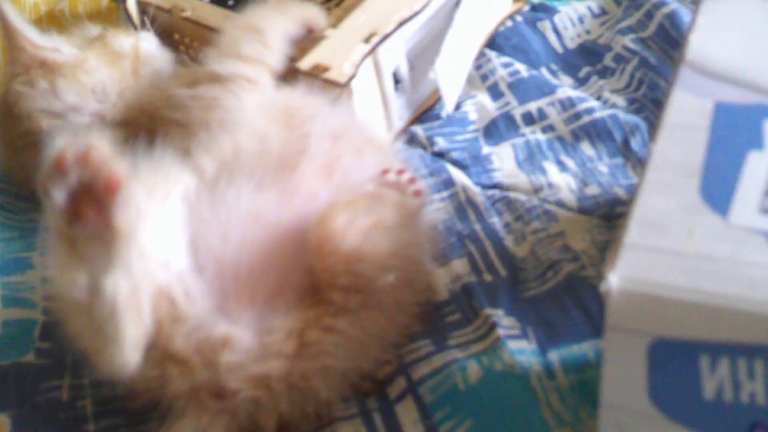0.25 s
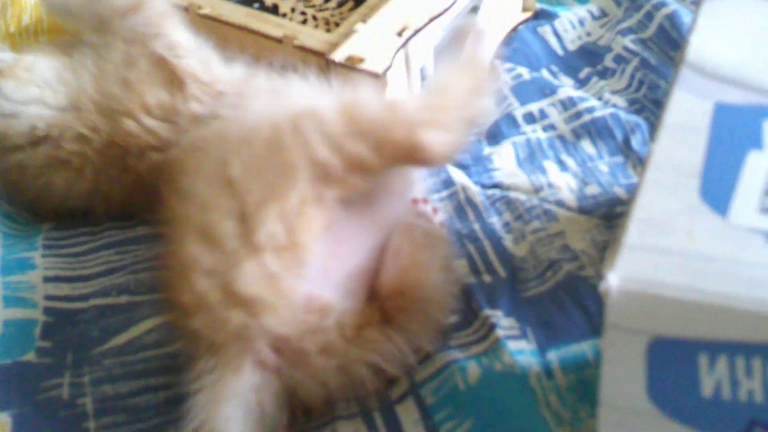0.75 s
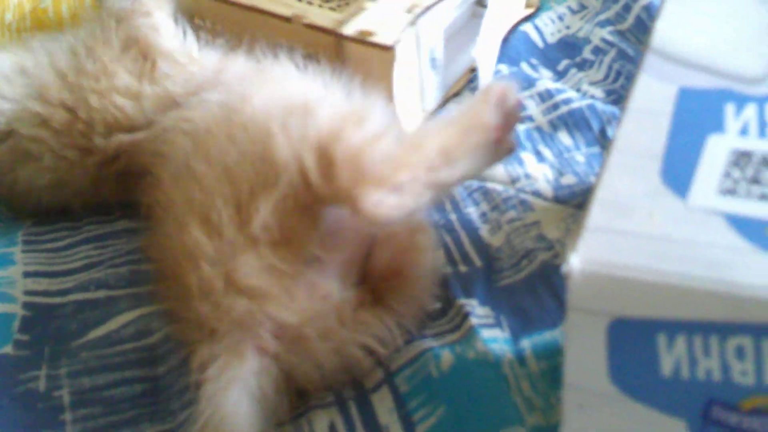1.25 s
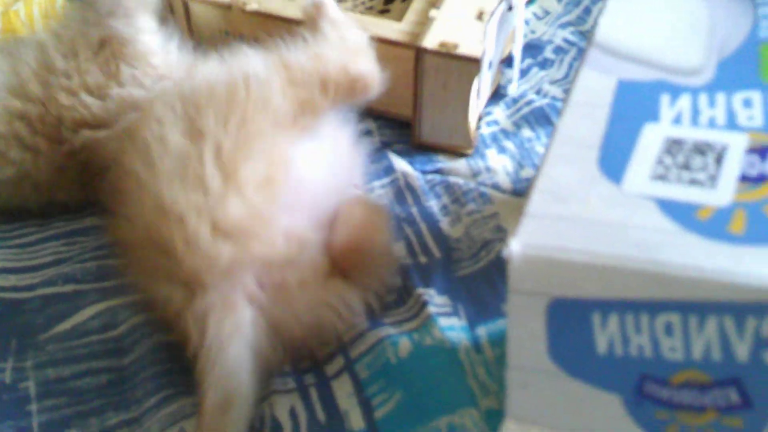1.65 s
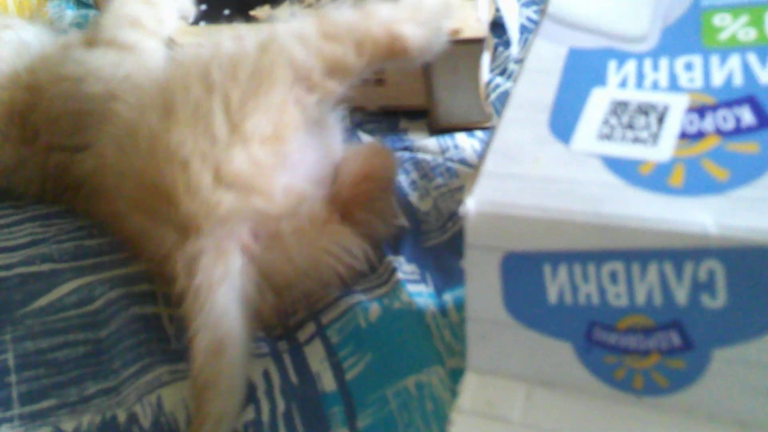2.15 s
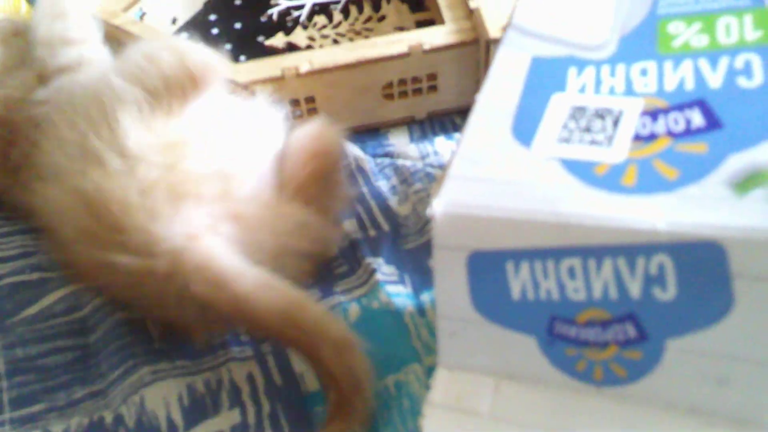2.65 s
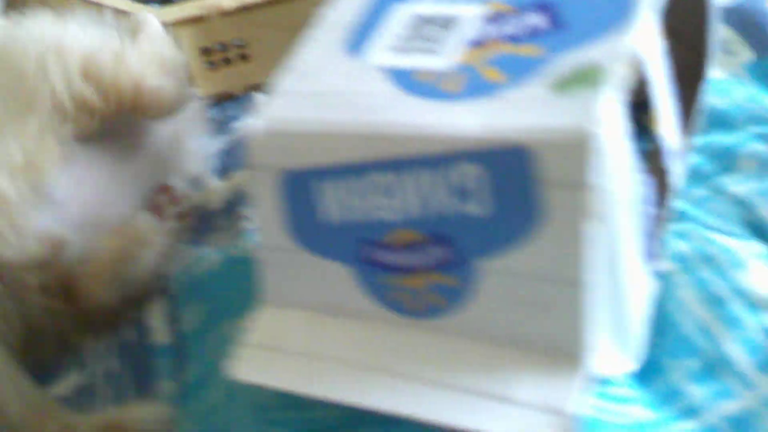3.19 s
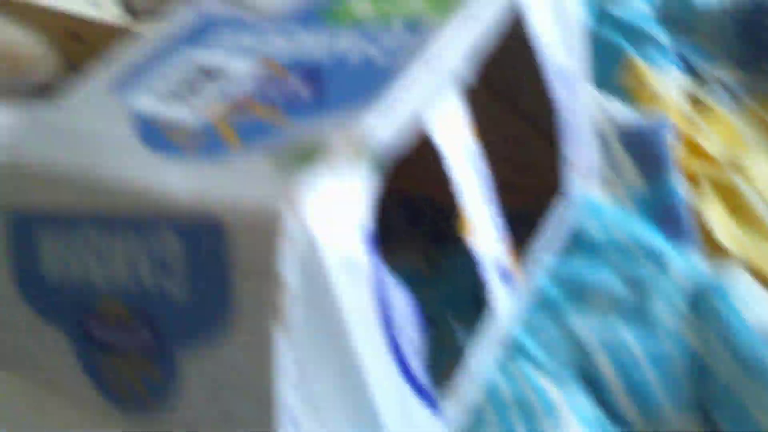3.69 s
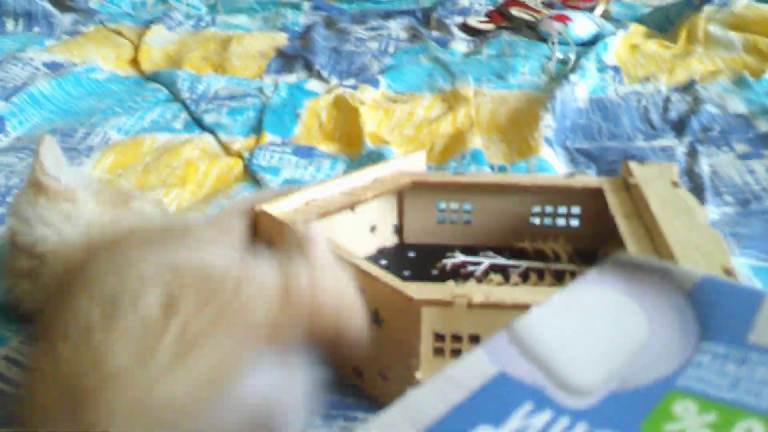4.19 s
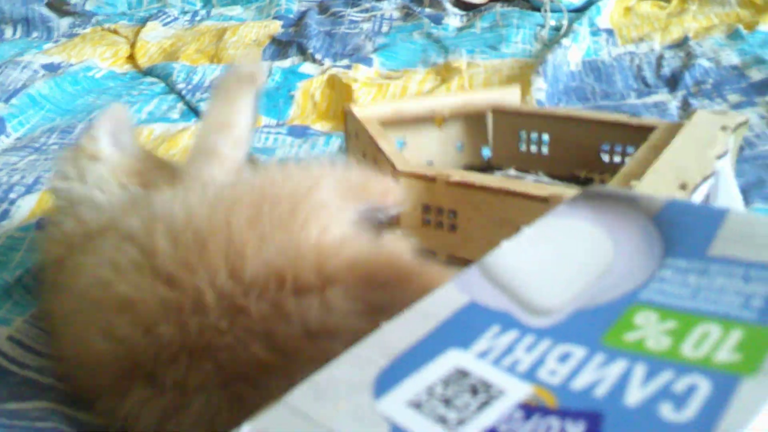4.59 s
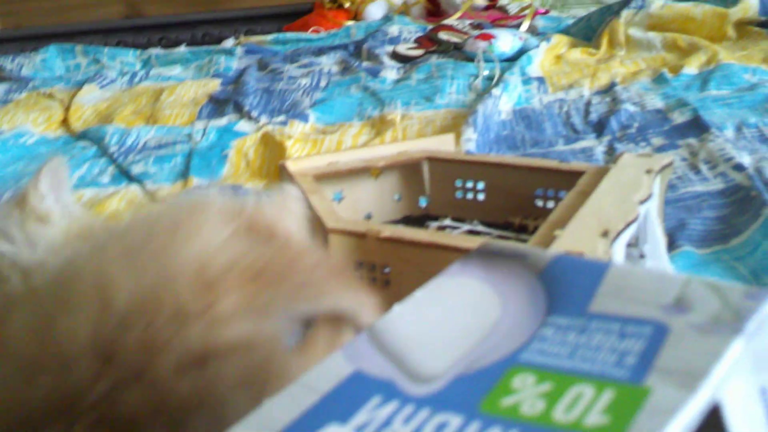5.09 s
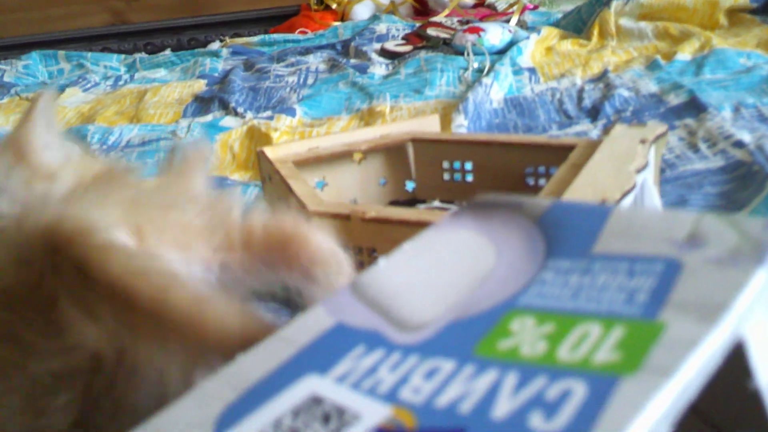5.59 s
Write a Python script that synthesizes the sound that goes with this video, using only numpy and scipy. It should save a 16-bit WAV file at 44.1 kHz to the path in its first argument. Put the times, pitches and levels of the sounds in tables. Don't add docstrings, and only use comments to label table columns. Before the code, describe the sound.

Small claws tap, scratch and drag on a thin wooden box over low hum, then a soft thud and two hollow carton knocks.

```python
import sys
import numpy as np
from scipy import signal
from scipy.io import wavfile

SR = 44100
rng = np.random.default_rng(int(sys.argv[2]) if len(sys.argv) > 2 else 0)


def natural_amplitude(level_db):
    exponent = np.asarray(level_db, float) / 20
    return 10 ** exponent


def wrap_up_sound(samples):
    columns = np.atleast_2d(samples).T
    tamed = np.clip(columns, -1, 1)
    steps = np.round(tamed * 32767).astype(np.int16)
    wavfile.write(sys.argv[1], SR, steps)


N = 257544


def rms_one(x):
    return x / np.sqrt(np.mean(x ** 2) + 1e-20)


def curve(rows):
    s, level_db = np.transpose(rows)
    return np.interp(np.arange(N) / SR, s, level_db)


def drift(rate_hz):
    r = np.exp(-80 * np.pi * rate_hz / SR)
    white = rng.standard_normal(N // 40 + 2002)
    slow = signal.lfilter([1], [1, -2 * r, r * r], white)[2000:]
    return np.interp(np.arange(N) / 40, np.arange(len(slow)), rms_one(slow))


def ring(force, hz, width_hz):
    r, w = np.exp(-np.pi * width_hz / SR), 2 * np.pi * hz / SR
    return signal.lfilter([0, np.sin(w)], [1, -2 * r * np.cos(w), r * r], force + 1e-18)


def ring_width(t60_s):
    return np.log(1000) / np.pi / t60_s


def grains(size, per_s, spread_db):
    strength = natural_amplitude(spread_db * np.minimum(rng.exponential(1, size), 4))
    strength = strength * rng.choice([-1, 1], size)
    return rms_one(strength * (rng.random(size) < per_s / SR))


def blows(table, modes, push, swing, turn):
    out, size = np.zeros(N + SR), SR // 2
    ms = np.arange(size) / SR * 1000

    def bump(start_ms, contact_ms):
        return np.sin(np.pi * np.clip((ms - start_ms) / contact_ms, 0, 1)) ** 4

    for s, peak_db, contact_ms, second_ms, strength in table:
        first = bump(0, contact_ms)
        contact = first + strength * bump(second_ms, contact_ms)
        body = 0
        for k, (hz, db, t60) in enumerate(modes):
            body = body + turn ** (k + 1) * natural_amplitude(db) * ring(contact / first.sum(), hz, ring_width(t60))
        blow = swing * body + push * contact
        out[round(s * SR):][:size] += natural_amplitude(peak_db) * blow / np.abs(blow).max()
    return out[:N]


# f/Hz, level/dB per Hz
AIR_COLOUR = [(22, -7), (40, 1), (75, -11), (120, -8.5), (160, -13.5), (265, -18), (400, -20), (750, -34),
              (1000, -33), (2400, -40), (3300, -54), (5000, -76), (7500, -54.5), (9000, -48.5)]


def room_air():
    edges = 20 * 2 ** np.arange(0, 9.1, .5)
    white, out = rng.standard_normal((2, N)), 0
    hz, level_db = np.transpose(AIR_COLOUR)
    for k, (low, high) in enumerate(zip(edges, edges[1:])):
        band_pass = signal.butter(2, [low, high], "band", fs=SR, output="sos")
        band = signal.sosfilt(band_pass, white[k % 2])
        band_db = np.interp(np.log(low * high) / 2, np.log(hz), level_db)
        out = out + band * natural_amplitude(band_db + 1.2 * drift(5))
    return natural_amplitude(-54.5) * rms_one(out)


# multiple of the mains pitch, level/dB
HUM_LINES = [(1, -52), (2, -72), (3, -65), (4, -68), (5, -71)]


def mains_hum():
    t, mains_hz, out = np.arange(N) / SR, 49.06, 0
    for k, db in HUM_LINES:
        tone = np.sin(2 * np.pi * (k * mains_hz * t + rng.random()))
        out = out + natural_amplitude(db + .6 * drift(2)) * tone
    return natural_amplitude(1.5) * out


# t/s, level/dB
MOTOR_LEVEL = [(0, -68.5), (3.06, -73.5), (4.0, -60.5), (4.7, -60), (4.83, -54.5), (5.2, -59),
               (5.38, -49.5), (5.48, -57.5), (5.58, -56.5), (5.84, -55.5)]


def motor_drone():
    pitch_hz = 163.1 + 3.98 * drift(3)
    tone = natural_amplitude(3.4 * drift(8.3)) * np.sin(2 * np.pi * np.cumsum(pitch_hz) / SR)
    return natural_amplitude(curve(MOTOR_LEVEL)) * tone


# t/s, level/dB
AIR_PUSH = [(0, -62), (1.3, -53.5), (2.1, -66.5), (2.4, -56), (3.4, -57), (3.9, -56), (4.3, -49.5),
            (4.68, -43), (5.09, -58), (5.37, -47), (5.84, -65.5)]


def moving_air():
    sway = ring(ring(rng.standard_normal(N), 13, 3), 15, 3.6)
    return natural_amplitude(curve(AIR_PUSH)) * rms_one(sway)


# f/Hz, width/Hz, level/dB
BOX_PANELS = [(408, 198, 3.5), (511.2, 23.3, -3), (609, 47.3, -1), (773.6, 59, 1), (861.7, 29, -4),
              (1020, 193, -2.5), (1500, 71, -4), (1900, 156, -1.5), (2082, 51, -7.5), (2320, 90, -4.5),
              (2818, 158, -4.5), (3150, 150, -9), (3473, 127, -14.5), (4050, 140, -21.5), (5400, 550, -47),
              (6100, 170, -29.5), (6970, 1200, -13.5), (8550, 310, -13.5)]
# t/s, level/dB
RUB_WEIGHT = [(0, -59.5), (.3, -61.5), (.5, -64.5), (.85, -66), (1.28, -61.5), (1.54, -56.5), (1.69, -65.5),
              (2.05, -62.5), (2.3, -58), (2.43, -59), (2.6, -61.5), (2.98, -67.5), (3.53, -64), (4.0, -60),
              (4.29, -61), (4.37, -56), (4.99, -66.5), (5.84, -65.5)]
# level/dB at mean weight, share of the weight's swing, level/dB under a full touch
RUB_PARTS = [(-73.5, 1, -28.5), (-101, .2, -48), (-84, .4, -52.5)]


def fur():
    slips = grains(N, per_s=5000, spread_db=3) + .3 * grains(N, per_s=400, spread_db=3)
    together = drift(6)
    parts = np.zeros((4, N))
    for k, (hz, width, level_db) in enumerate(BOX_PANELS):
        patch = natural_amplitude(level_db + 1.5 * together + 1.3 * drift(20))
        part = int(hz > 1200) + int(hz > 3700) + int(hz > 4800)
        parts[part] += (-1) ** k * ring(slips * patch, hz, 1.68 * width)
    parts[2] = rms_one(ring(parts[2], 4370, 70)) + 1.1 * rms_one(ring(slips, 3950, 700))

    weight_db, slide, mean_db = curve(RUB_WEIGHT), lingering(), -63
    gains = [natural_amplitude(weight_db)]
    for db, share, touch_db in RUB_PARTS:
        gains.append(natural_amplitude(db + share * (weight_db - mean_db)) + natural_amplitude(touch_db) * slide)
    gains = np.array(gains)
    gains[2:] += brushing()
    return sum(gain * rms_one(part) for gain, part in zip(gains, parts))


# t/s, peak level/dB, loudest ring f/Hz, low panels level/dB
PAT_TOUCHES = [(0.182, -36.5, 1730, -6), (0.7, -51.5, 2320, -11), (0.8, -51.5, 1600, -6),
               (1.2281, -42.5, 2330, -17), (1.4486, -37, 2830, -13), (1.6222, -43.5, 2020, -20),
               (1.7439, -32, 2270, -7.5), (1.9355, -45.5, 1900, 2.5), (2.0393, -37.5, 1340, -9),
               (2.2682, -53, 2270, 3), (2.4104, -42, 1500, -6.5), (2.4633, -58, 1500, 4),
               (2.5137, -55, 2470, 2.5), (2.6743, -54.5, 1460, 12), (2.7457, -52.5, 1700, 1),
               (2.9078, -33.5, 1670, -15.5), (3.6456, -28.5, 2320, -19), (4.1584, -55.5, 1530, 11),
               (4.1999, -49, 1450, 9), (4.2223, -55, 1020, 10), (4.2494, -53, 1200, 7.5),
               (5.3023, -31, 2065, -13)]
SCRATCH_TOUCHES = [(0.035, -47.5, 2120, -12), (0.3755, -46.5, 1430, -6), (0.398, -45.5, 1850, -17),
                   (0.9058, -33.5, 2500, -18), (1.045, -42, 1430, -9.5), (1.2032, -42.5, 1900, -14),
                   (1.5594, -58, 1630, 10.5), (1.6394, -50.5, 1900, -4), (1.7694, -33, 1360, -10),
                   (1.8726, -51, 1500, -2), (1.9494, -39, 2770, -28), (2.1464, -49, 2280, 8),
                   (2.1565, -40.5, 1380, -5.5), (2.6125, -46, 1500, 2), (2.6449, -47, 2280, -5),
                   (2.8579, -48, 1480, 2.5), (2.8784, -40.5, 1620, -5), (3.8691, -48, 1500, 0.5),
                   (4.0522, -36.5, 1930, -27), (4.37, -43.5, 2900, -10.5), (4.395, -53, 2680, -19),
                   (4.4802, -47.5, 1660, -15), (4.6374, -53.5, 2030, 2), (4.912, -55.5, 1390, 4),
                   (4.955, -52.5, 2050, -8), (5.1896, -59, 1490, -20), (5.3238, -31.5, 1970, -21),
                   (5.6496, -55, 2380, -16)]
DRAG_TOUCHES = [(0.9294, -37, 1325, -28), (1.1682, -43.5, 2320, -59), (1.4694, -46, 2460, -1.5),
                (2.245, -57.5, 1500, 0), (2.363, -52, 1500, 1), (3.57, -48, 1500, -3),
                (3.6294, -36.5, 1350, -3.5), (3.6566, -40.5, 2920, -28), (3.8077, -45, 1950, -13),
                (3.9873, -49, 1900, -8), (4.3246, -45.5, 1740, -3), (4.558, -39, 1950, -17),
                (4.7711, -43, 1960, -8), (5.2814, -43.5, 1500, 0), (5.457, -41.5, 2010, -4)]


def touches():
    kinds = (PAT_TOUCHES, 0.083), (SCRATCH_TOUCHES, 0.17), (DRAG_TOUCHES, 0.26)
    return [(*row, t60) for rows, t60 in kinds for row in rows]


def claws():
    after = np.arange(SR // 4) / SR
    force = np.zeros((len(BOX_PANELS), N + len(after)))
    hz, width, level_db = np.transpose(BOX_PANELS)
    for s, peak_db, ring_hz, low_db, t60 in touches():
        spot = rng.standard_normal(len(BOX_PANELS))
        top_db = -35 - 0.3 * (peak_db + 48.5)
        scratch = 0.079 * grains(len(after), per_s=6000, spread_db=5.0) * natural_amplitude(-60 * after / t60)
        octaves_away = np.abs(np.log2(hz / ring_hz))
        near_db = -7 * np.minimum(octaves_away / 0.16, 1)
        group_db = np.where(hz < 1200, low_db, np.where(hz > 3300, top_db + 31.5, near_db))
        panel_gain = natural_amplitude(peak_db - 6.5 + level_db + group_db + 4.2 * spot)
        at = round(s * SR)
        force[:, at:at + len(after)] += np.outer(panel_gain, scratch)
    return sum((-1) ** k * ring(force[k, :N], hz[k], width[k]) for k in range(len(BOX_PANELS)))


def lingering():
    s, peak_db = np.transpose(touches())[:2]
    presses = np.zeros(N)
    presses[np.round(s * SR).astype(int)] = natural_amplitude(peak_db)
    slide_t60_s = 0.17
    return signal.lfilter([1], [1, -natural_amplitude(-60 / slide_t60_s / SR)], presses)


def room(x):
    t, t60_s = np.arange(SR // 2) / SR, 0.079
    tail = rng.standard_normal(len(t)) * natural_amplitude(-60 * t / t60_s) * (t > .004)
    tail = signal.lfilter([.4], [1, -.6], tail)
    return signal.fftconvolve(x, tail / np.sqrt(np.sum(tail ** 2)))[:N]


# t/s, peak level/dB, ring f/Hz, whole box level/dB
EDGE_TICKS = [(0.9058, -46, 2500, -4), (1.046, -56.5, 2290, 1), (1.1682, -51, 2460, -5.5),
              (1.448, -39, 2680, -6), (1.6222, -43, 1940, -15), (1.7427, -50, 2350, -5),
              (3.8077, -46.5, 2030, -11.5), (5.457, -76, 2000, 15), (5.6274, -70, 7100, 2)]
WALL_TICKS = [(0.184, -48.5, 1630, 6), (1.7754, -58, 2880, -24), (1.9359, -52, 1930, 10),
              (2.0384, -56.5, 1500, 9.5), (2.1565, -53, 2150, 2), (2.3896, -58, 2460, 11.5),
              (2.4106, -55.5, 3180, -12), (2.5137, -39.5, 2363, -10), (2.5274, -50, 2320, -12),
              (2.6743, -54, 1570, 1), (2.7448, -57.5, 1670, 8), (2.8804, -54, 1560, -4),
              (3.6567, -35.5, 2814, 1.5), (3.913, -61, 3020, -13), (3.987, -53, 1880, -14),
              (4.051, -40.5, 1870, -7), (4.202, -55, 1900, -14), (4.225, -47, 1920, -13),
              (4.256, -48, 1050, -17), (4.3251, -60, 3000, -4), (4.48, -46.5, 1670, -6),
              (4.5577, -49, 3200, -10), (4.559, -35, 2025, -21), (4.5725, -43, 2455, -11),
              (4.7711, -47, 2000, -8), (5.134, -55, 2540, 8), (5.6496, -59.5, 2370, -5)]
FLOOR_TICKS = [(0.185, -47, 594, -20), (2.857, -43.5, 510, -8), (3.884, -47.5, 745, -2),
               (4.2, -46, 813, -4), (4.2225, -39.5, 523, -13), (4.637, -42.5, 785, -9),
               (4.771, -46.5, 794, -11), (5.2815, -46.5, 800, -13)]


def ticks():
    out, whole, top = np.zeros((3, N + SR))
    after = np.arange(SR // 20) / SR
    kinds = (EDGE_TICKS, 0.013, 12.5), (WALL_TICKS, 0.027, 1.2), (FLOOR_TICKS, .042, -10.5)
    every = [(*row, t60, top_db) for rows, t60, top_db in kinds for row in rows]
    for s, peak_db, hz, whole_db, t60, top_db in every:
        skid = rng.standard_normal(len(after)) * natural_amplitude(-60 * after / 0.011)
        skid[0] = 3.8
        swell = ring(signal.unit_impulse(SR // 4), hz, 750)
        panel = ring(swell, hz, ring_width(t60))
        at = round(s * SR)
        out[at:at + len(panel)] += natural_amplitude(peak_db) * panel / np.abs(panel).max()
        whole[at:at + len(after)] += natural_amplitude(peak_db + whole_db - 8.5) * skid
        top[at:at + len(after)] += natural_amplitude(peak_db + whole_db + top_db - 6.0) * skid
    for k, (hz, width, db) in enumerate(BOX_PANELS):
        force = top if hz > 3300 else whole
        out += (-1) ** k * natural_amplitude(db) * ring(force, hz, 8.1 * width)
    return out[:N]


# t/s, dying t60/s, slat level/dB, hiss level/dB
EDGE_BRUSHES = [(1.447, 0.3, -85, -64), (1.765, 0.36, -78, -76), (2.1, 1, -83.5, -85),
                (2.36, 0.51, -80, -83), (3.65, 0.2, -69, -84), (4.053, 0.15, -73, -90),
                (5.299, 0.46, -84, -85)]


def brushing():
    out = np.zeros((2, N))
    for s, t60, *db in EDGE_BRUSHES:
        after = np.maximum(np.arange(N) / SR - s, 0)
        out += np.outer(natural_amplitude(np.array(db)), np.minimum(after / .008, 1) * natural_amplitude(-60 * after / t60))
    return out


# t/s, peak level/dB, contact/ms, second corner/ms, its strength
BED_LANDINGS = [
    (4.176, -35, 13.2, 11.7, 0.3),
    (4.290, -23, 3.54, 15.7, 0.22),
    (4.32, -33, 6.4, 7.3, 0.24),
]
# f/Hz, level/dB, t60/s
BED_MODES = [(37.2, -1.5, 0.36), (107.3, 13, 0.087), (143, 8, 0.052), (224, 3.5, 0.065), (397, 10.5, 0.013),
             (477, -1, .03)]


def thuds():
    return blows(BED_LANDINGS, BED_MODES, push=3.3, swing=-0.97, turn=0.94)


# t/s, peak level/dB, contact/ms, second corner/ms, its strength
CARTON_KNOCKS = [
    (4.1995, -47, 0.6, 2.4, 0.4),
    (4.223, -34.5, 0.84, 1.7, 0.54),
    (4.238, -44, 1.0, 3.4, 0.26),
    (5.0225, -13, 0.51, 1.377, -0.73),
    (5.1336, -23.5, 0.82, 1.37, -0.7),
]
# f/Hz, level/dB, t60/s
CARTON_MODES = [(197, -25, 0.0067), (432, -48, 0.029), (540, -2, 0.03), (780, 12, 0.036), (1042, 2, 0.025),
                (1443, 16.5, 0.023), (1570, 8, 0.016), (2100, -3, 0.023), (2470, -5, 0.014),
                (2858, 0, 0.022), (3130, -23, 0.043), (3880, -17.5, 0.012)]


def knocks():
    return blows(CARTON_KNOCKS, CARTON_MODES, push=0.078, swing=0.9, turn=-1.223)


def crack():
    after = np.arange(N) / SR - CARTON_KNOCKS[3][0]
    high_pass = signal.butter(2, 3000, "high", fs=SR, output="sos")
    rattle = signal.sosfilt(high_pass, rng.standard_normal(N))
    return natural_amplitude(-43 - 60 * np.abs(after) / 0.015) * (after > 0) * rattle


def scene():
    background = room_air() + mains_hum() + motor_drone() + moving_air()
    hits = claws() + ticks() + knocks() + crack()
    near = fur() + hits + natural_amplitude(-28.5) * room(hits) + thuds()
    return (background + near)[None]


def top_cut(x):
    return signal.sosfilt(signal.butter(12, 9090, fs=SR, output="sos"), x)


def record(dry):
    low_pass = signal.cheby2(10, 50, 9000, fs=SR, output="sos")
    mix = signal.sosfilt(low_pass, dry)
    return top_cut(mix)


dry = scene()
out = record(dry)
wrap_up_sound(out)
```